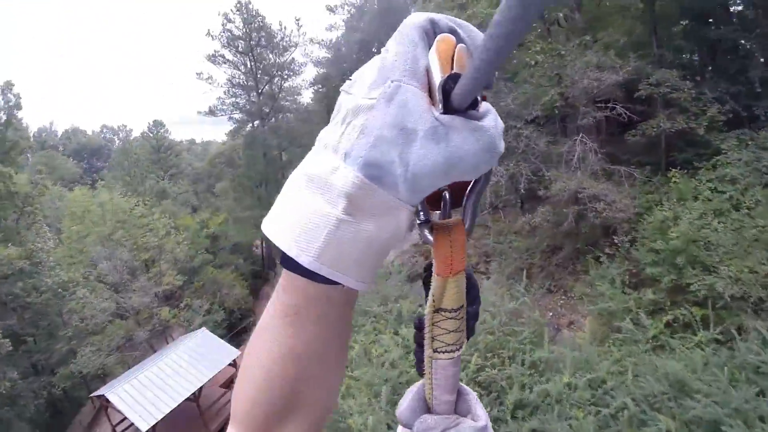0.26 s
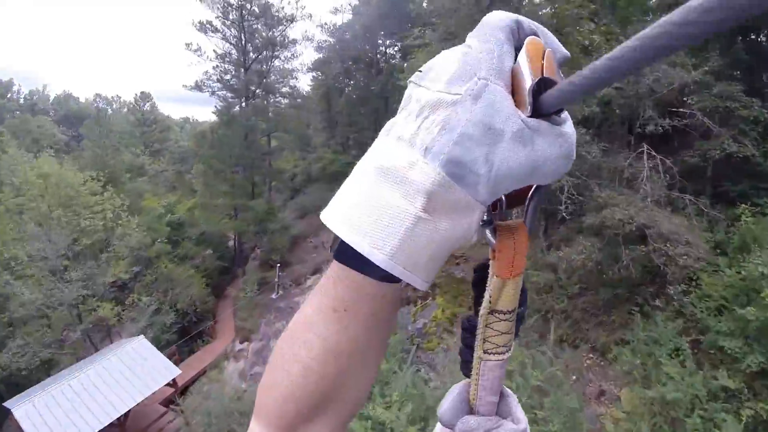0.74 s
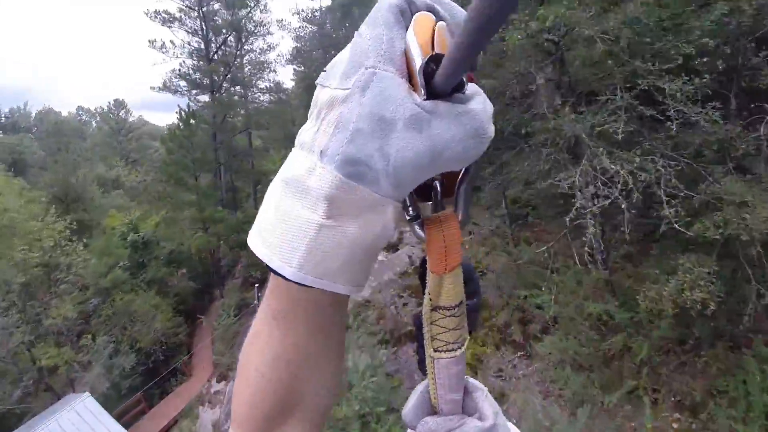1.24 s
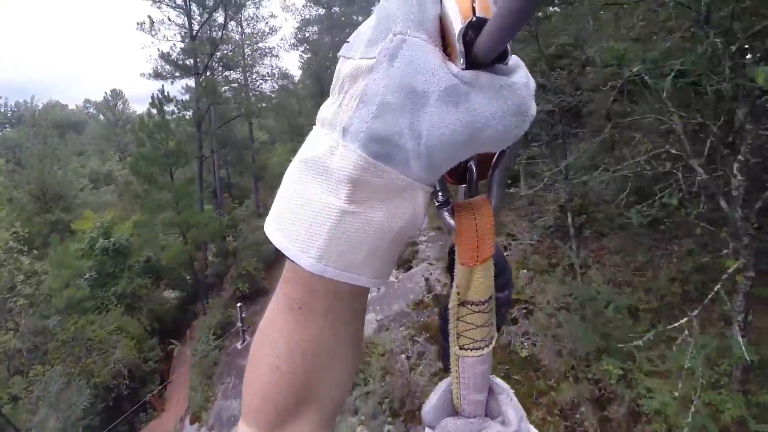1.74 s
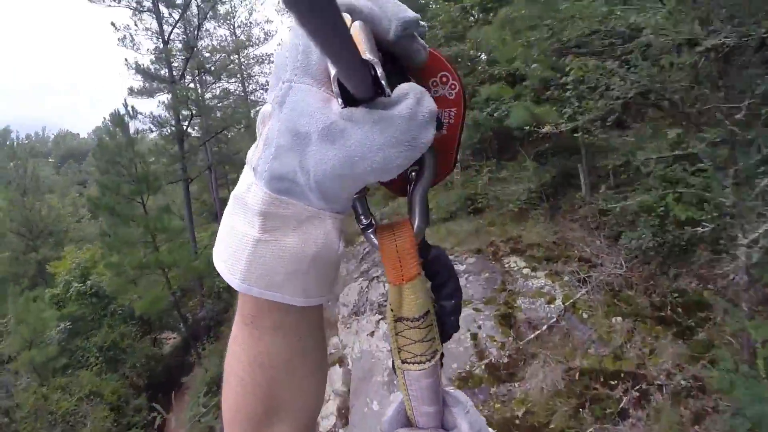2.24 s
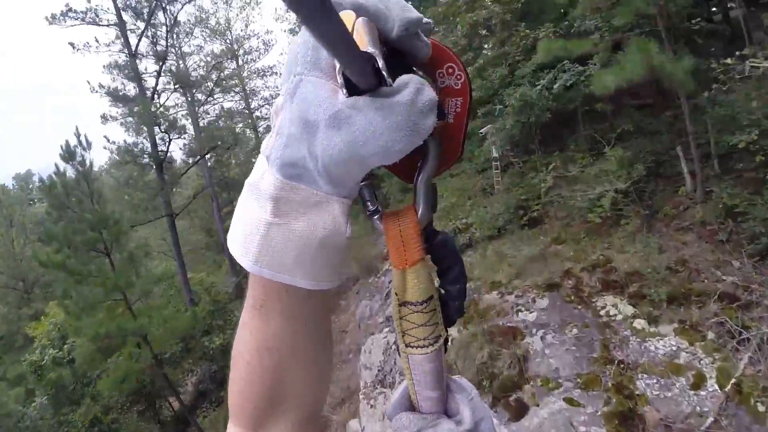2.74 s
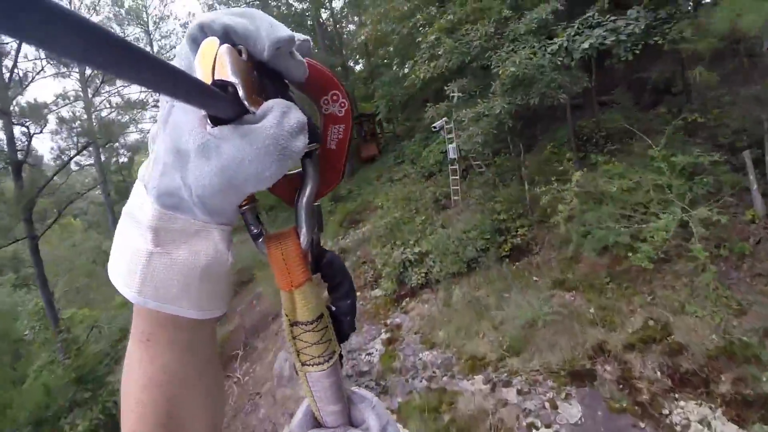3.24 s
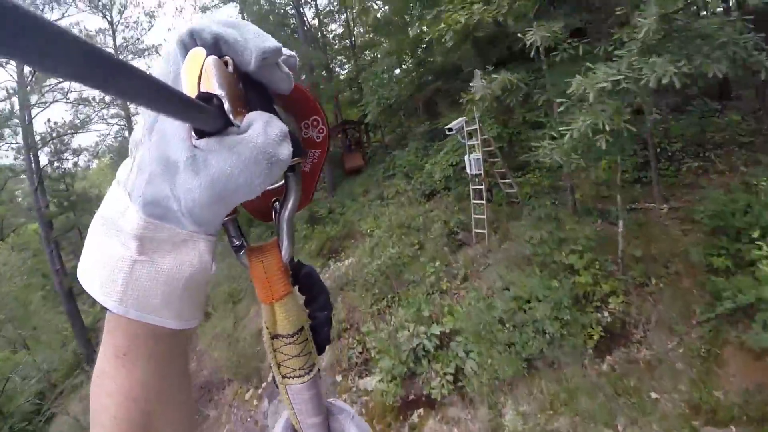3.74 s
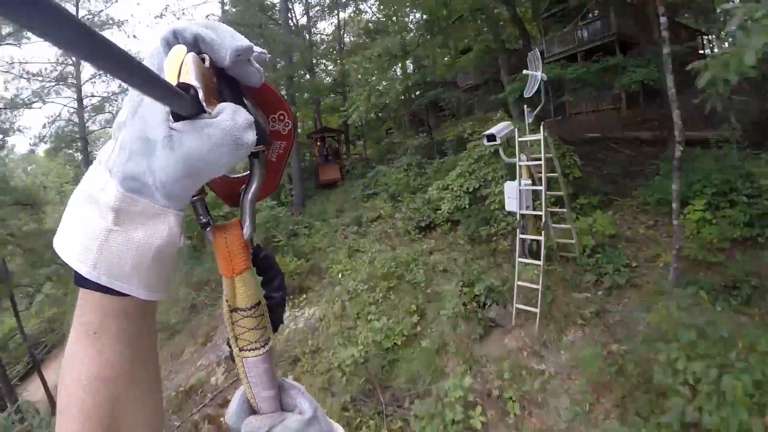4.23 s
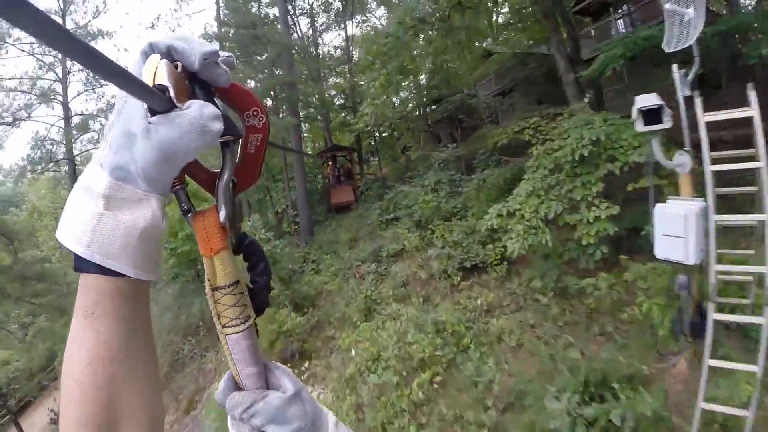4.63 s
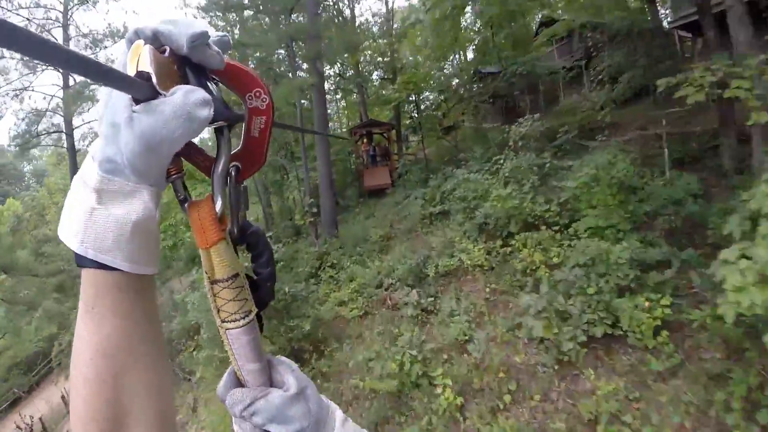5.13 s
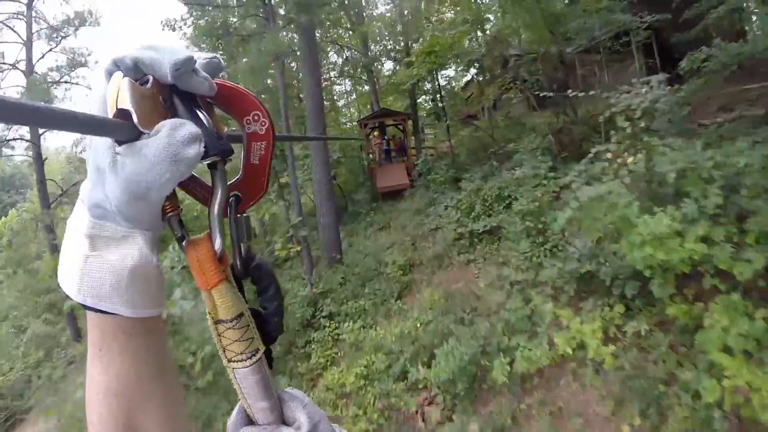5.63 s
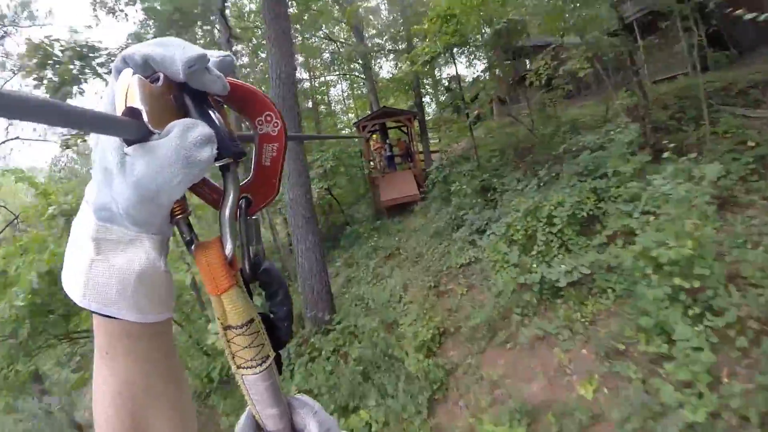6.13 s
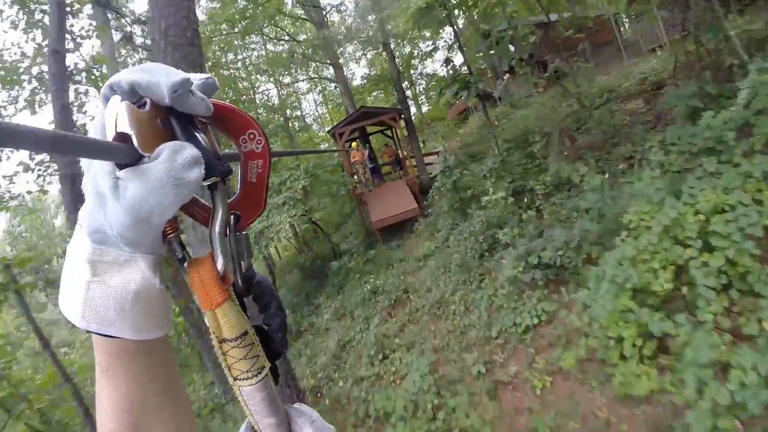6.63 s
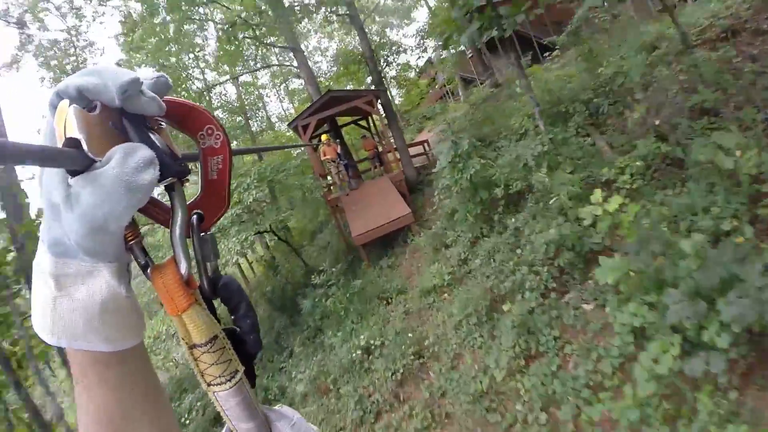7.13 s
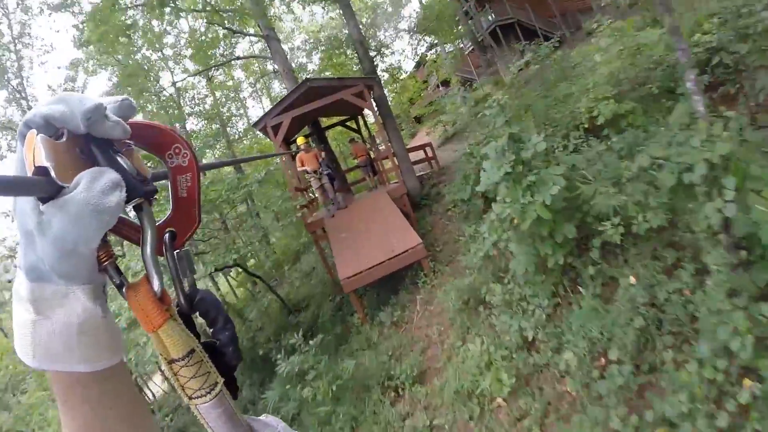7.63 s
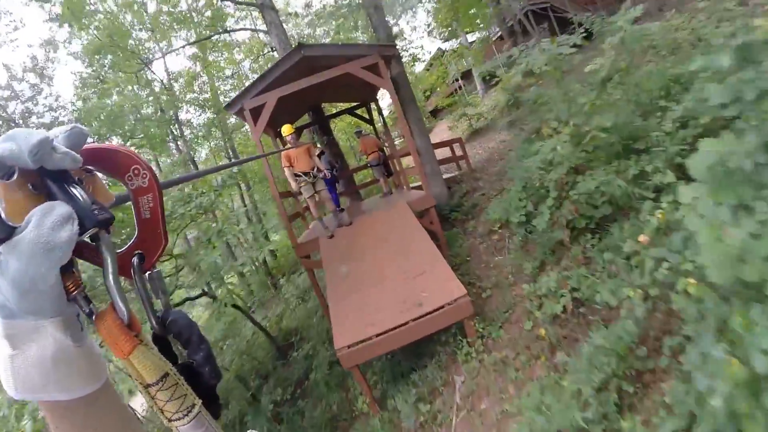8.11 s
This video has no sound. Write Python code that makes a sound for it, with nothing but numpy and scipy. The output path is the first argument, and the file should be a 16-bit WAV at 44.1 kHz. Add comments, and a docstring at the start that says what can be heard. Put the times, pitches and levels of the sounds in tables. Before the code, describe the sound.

Heard at arm's length by the rider, a zipline trolley is already rolling fast on a stranded steel cable. Its bright, grinding whir and buzzing hum climb a little in pitch, hold, then drop steadily as the ride slows. Narrow metallic rings emerge toward the end, while light low wind rumbles on the microphone and fades. Open woods, dry and close.

```python
"""A zipline trolley runs down a stranded steel cable through woods, heard at arm's length from the rider.
Its grind is a pulsing contact force, of noise and brief ticks, that excites the resonances of the metal.
The strands crossed give a harmonic hum whose pitch follows the speed, over a dull noise roar.
The trolley swivels under the rider's hand, which changes its colour; narrow rings emerge as it slows.
Air rumbles lightly on the microphone as resonant noise that grows with speed."""
import sys
import numpy as np
from scipy import signal
from scipy.io import wavfile

SR = 44100
rng = np.random.default_rng(int(sys.argv[2]) if len(sys.argv) > 2 else 0)


def wav_out(sig):
    """Save sig, one row per channel (or a flat mono array), as 16-bit PCM at SR to the path in sys.argv[1]."""
    wavfile.write(sys.argv[1], SR, np.round(np.clip(np.atleast_2d(sig).T, -1, 1) * 32767).astype(np.int16))


N = 369116
CRUISE_HZ = 220  # strands crossed per second at cruising speed


def from_db(db):
    """Logarithmic level: decibels become an amplitude gain."""
    return 10 ** (np.asarray(db) / 20)


def rms_one(x):
    """Power normalisation: the signal is scaled to unit rms."""
    return x / np.sqrt(np.mean(x ** 2) + 1e-20)


def in_time(rows):
    """Linear interpolation: each column of a curve, sample by sample."""
    seconds, *columns = np.transpose(rows)
    time = np.arange(N) / SR
    return [np.interp(time, seconds, column) for column in columns]


def drift(rate_hz):
    """Low-pass filtered randomness: smooth wandering with a spread of about 1."""
    step = 40  # samples between computed points
    r = np.exp(-2 * np.pi * rate_hz * step / SR)
    noise = rng.standard_normal(N // step + 2002)
    slow = signal.lfilter([1], [1, -2 * r, r * r], noise)[2000:]  # the filter has settled by then
    return np.interp(np.arange(N) / step, np.arange(len(slow)), rms_one(slow))


def resonate(x, hz, width_hz):
    """Damped resonance: a two-pole band-pass applied twice, for steep skirts; gain near 1 on top."""
    r = np.exp(-np.pi * width_hz / SR)
    g = (1 - r * r) / 2
    section = [g, 0, -g, 1, -(1 + r * r) * np.cos(2 * np.pi * hz / SR), r * r]
    return signal.sosfilt([section, section], x)


def rush(modes):
    """Resonant filtering of noise: independent noise sounds in each resonance; rms 1 in all."""
    bands = [from_db(db) * resonate(rng.standard_normal(N), hz, width) for hz, width, db in modes]
    return rms_one(sum(bands))


# Heading of the trolley. Each row: time in seconds, swivel (-1 right, 0 straight, 1 left).
HEADING_CURVE = [(0, 0.68), (.25, -0.68), (1.15, -0.85), (1.4, -.3), (1.9, -0.55), (2.15, -.06), (2.9, -.1),
                 (3.15, 0.54), (4.4, 0.73), (4.7, 0.97), (8.37, 0.89)]


def heading():
    """Directional radiation depends on angle: how far the trolley is swung right and left, each 0-1."""
    swivel, = in_time(HEADING_CURVE)
    return np.maximum(-swivel, 0), np.maximum(swivel, 0)


# Air on the microphone and its housing. Each row: centre in Hz, width in Hz, relative level in dB.
WIND_RESONANCES = [(32.2, 32, 2), (84, 79, -5.5), (154.5, 35, -0.5), (238.3, 28, -6.5)]
# Breeze added to the air of the ride. Each row: time in seconds, change of level in dB.
BREEZE_CURVE = [(0, 1), (.9, 2.5), (1.6, -1.5), (3.5, 1.5), (5, 0), (5.8, -4), (6.6, 1), (8.37, 2)]
WIND_DB, WIND_DB_PER_DOUBLING = -38.5, 26.5  # at cruising speed, rise per doubling of speed


def wind(doublings, gust_db=1.0, gust_rate_hz=6):
    """Flow noise: lumpy air on the moving microphone grows with speed and with the breeze."""
    breeze_db, = in_time(BREEZE_CURVE)
    level_db = WIND_DB + WIND_DB_PER_DOUBLING * doublings + breeze_db
    gusts = from_db(gust_db * drift(gust_rate_hz))
    return from_db(level_db) * rms_one(rush(WIND_RESONANCES) * gusts)


# Dull roar of the running cable. Each row: centre in Hz, width in Hz, relative level in dB.
ROAR_RESONANCES = [(360, 660, -5), (656, 245, 1.5), (916, 187, 6)]


def cable_roar(level_db=-47.0, right_db=-4.5, left_db=0.9):
    """Broadband excitation of broad resonances: a dull roar whose level follows the heading."""
    right, left = heading()
    return from_db(level_db + right * right_db + left * left_db) * rush(ROAR_RESONANCES)


# Harmonics of the hum, before the side plates reinforce them. Each row: multiple of the strand rate,
# level in dB at cruising speed and straight heading, change in dB per doubling of speed,
# change in dB when swung right, change in dB when swung left.
HUM_HARMONICS = [(2, -52, -6.5, -12.5, -6), (3, -50.5, 51, -25, 0.5), (4, -44, 12.5, -3.5, 0.5),
                 (5, -42.5, -1, -9, -14.5), (6, -47, 3, -4, 2.5), (7, -42, -3, 6.5, -6), (8, -62, 5, 2, -6)]


def strand_hum(strands, speed, waver_db=1.0, waver_rate_hz=7, fade_db=2.2, fade_rate_hz=0.97,
               slip_rad=0.13, slip_rate_hz=14, plate_hz=1345, plate_half_width_hz=38, plate_boost=1.5):
    """Periodic excitation: harmonics of the strand rate waver, and sing out at the side plates' resonance."""
    right, left = heading()
    doublings = np.log2(speed / CRUISE_HZ)
    hum = np.zeros(N)
    for multiple, db, slope_db, right_db, left_db in HUM_HARMONICS:
        # slipping blurs the upper harmonics most
        phase = 2 * np.pi * strands + slip_rad * drift(slip_rate_hz)
        tone = np.sin(multiple * phase)
        detuning = (multiple * speed - plate_hz) / plate_half_width_hz
        plate_gain = 1 + plate_boost / (1 + detuning ** 2)
        level_db = db + slope_db * doublings + right * right_db + left * left_db
        unsteady = from_db(waver_db * drift(waver_rate_hz) + fade_db * drift(fade_rate_hz))
        hum += from_db(level_db) * plate_gain * rms_one(tone * unsteady)
    return hum


# Narrow rings that emerge as the trolley slows. Each row: centre in Hz, width in Hz, relative level in dB.
SLOW_RING_MODES = [(1752, 95, 8.5), (2020, 70, 0), (2683, 180, 5.5), (2950, 23, -7), (3750, 37, -15),
                   (4866, 210, 3), (5660, 160, -1.5)]


def slow_rings(slowed, level_db=-26):
    """Noise-driven narrow resonances: their power rises in proportion to the loss of speed."""
    return from_db(level_db) * np.sqrt(slowed) * rush(SLOW_RING_MODES)


# Swing of the contact force. Each row: multiple of the strand rate, depth as a share of the mean force.
FORCE_PULSES = [(2 / 3, 0.13), (0.88, 0.15), (2, 0.25), (4.9, 0.069)]


def contact(strands, flutter_db=0.37, flutter_rate_hz=9, grit_db=0.81, grit_rate_hz=250):
    """Amplitude modulation: force under the sheaves pulses with the strands and shakes on uneven wire."""
    pulses = 1 + sum(depth * np.cos(2 * np.pi * multiple * strands) for multiple, depth in FORCE_PULSES)
    unevenness_db = flutter_db * drift(flutter_rate_hz) + grit_db * drift(grit_rate_hz)
    return pulses * from_db(unevenness_db)


def ticks(per_s=230, size=6.6, spread_db=2.5, edge_hz=1300):
    """Impulsive excitation: single wires snap at random, too briefly to stir the low modes much."""
    sizes = size * from_db(spread_db * np.minimum(rng.exponential(1, N), 2))
    happens = rng.random(N) < per_s / SR
    snaps = happens * sizes * rng.choice([-1, 1], N)
    return signal.sosfilt(signal.butter(1, edge_hz, "high", fs=SR, output="sos"), snaps)


# Strength of the grind; only its swing about the mean is used. Each row: time in seconds, level in dB.
GRIND_CURVE = [(0.0, -18.5), (0.11, -20.5), (1.28, -19), (1.54, -17), (2.45, -16.5), (2.87, -17.5),
               (3.12, -16), (3.22, -18), (3.98, -17.5), (4.68, -20), (6.22, -18), (8.37, -21.5)]
# Borders in Hz of the low, middle, high and hiss registers.
REGISTER_BORDERS = [950, 2300, 4300, 7900, 15000]
# The registers, low to hiss. Each row: level in dB at mean strength, cruising speed and straight heading,
# share of the grind's swing, change in dB per doubling of speed, change in dB when swung right,
# change in dB when swung left.
REGISTER_LEVELS = [(-27.5, 0.85, -2.5, 2.5, 0.85), (-21, 1.11, -1, 0.8, 0.5), (-21.5, 1.35, 5.5, 0.8, 0.72),
                   (-33.5, 0.45, 12.5, -3, -8.5)]
# Resonances of trolley and cable, levels relative within a register. Each row: centre in Hz,
# width in Hz, level in dB when swung right, level in dB when straight, level in dB when swung left.
METAL_MODES = [ (1081, 162, -20, -8, -6.5), (1358.6, 80, -5.5, 9, 3), (1436.5, 132, -2.5, 0.5, 6),
               (1702, 91, -4.5, -1.5, 3), (1823, 87, -3, -0.5, 9), (2120, 1420, -17.5, -2, -4),
               (2625, 350, -3.5, 1.5, -9.5), (2825, 243, 0, -2, 2.5), (2930, 102, -6, -4, 2.5),
               (3020, 167, 2.5, 4, -5), (3194, 164, -17, 2, 0.5), (3428, 300, 2, 0, -2.5),
               (3698, 37, 5, 1.5, -3), (3847, 210, 6.5, -8, -9.5), (4090, 270, -5, -4.5, -10.5),
               (4520, 460, 3.5, 2, 0), (4847, 340, -1, 4.5, -1), (5010, 600, -1, 2, -27.5),
               (5440, 510, -3, 2, 2.5), (5990, 220, 3.5, 0, 2), (6450, 610, -7, -2.5, 0.5),
               (6780, 600, -2, -7, 9.5), (7086, 490, -11, -4.5, -3), (7320, 620, -6, -11, -6.5),
               (8100, 290, -1, 13.5, 0.5), (8520, 490, 2.5, 17, 3.5), (9880, 1840, 5.5, 8.5, 1),
               (10970, 2400, -1, -3, -6.5), (13100, 720, -5, 0, -3.5)]


def grind(force, doublings, sway_db=0.31, sway_rate_hz=2):
    """Modal excitation: rolling friction and ticks ring the metal; speed and heading set its colour."""
    right, left = heading()
    strength_db, = in_time(GRIND_CURVE)
    swell_db = strength_db - strength_db.mean()
    # four independent noises share the same ticks
    drives = force * (rng.standard_normal((4, N)) + ticks())
    out = np.zeros(N)
    for low, high, register in zip(REGISTER_BORDERS, REGISTER_BORDERS[1:], REGISTER_LEVELS):
        ringing, power = 0, 0
        for k, (hz, width, right_db, straight_db, left_db) in enumerate(METAL_MODES):
            if low <= hz < high:
                turn_db = right * (right_db - straight_db) + left * (left_db - straight_db)
                gain = from_db(straight_db + turn_db)
                ringing = ringing + gain * resonate(drives[k % len(drives)], hz, width)
                power = power + width * gain ** 2
        # dividing by the expected power leaves the heading's effect on level to the register
        db, share, slope_db, right_db, left_db = register
        level_db = db + share * swell_db + slope_db * doublings + right * right_db + left * left_db
        sway = sway_db * drift(sway_rate_hz)
        out += from_db(level_db + sway) * rms_one(ringing / np.sqrt(power))
    return out


# Antiresonances between the trolley's modes. Each row: centre in Hz, width in Hz,
# depth 0-1 when straight or right, depth 0-1 when left.
ANTIRESONANCES = [(1655, 70, 0, 0.36), (1940, 74, 0, 0.6), (3050, 91, 0.08, 0.8), (3584, 150, 0, 0.6),
                  (4260, 140, 0.7, 0.36), (4990, 83, 0, 0.44), (5880, 140, 0.27, 0.03), (7990, 220, 0.1, 0),
                  (9900, 360, 0, 0.3)]


def hollow(x):
    """Antiresonance: neighbouring modes cancel in narrow bands, to a depth that follows a left swing."""
    _, left = heading()
    for hz, width, straight_depth, left_depth in ANTIRESONANCES:
        band = signal.lfilter(*signal.iirpeak(hz, hz / width, fs=SR), x)
        depth = np.clip(straight_depth + left * (left_depth - straight_depth), 0, 1)
        x = x - depth * band
    return x


# The trolley gathers speed down the sag, then slows on the rise.
# Each row: time in seconds, strands crossed per second before the wobble.
SPEED_CURVE = [(0.0, 195.5), (0.47, 201.8), (0.65, 208.1), (1.37, 215.1), (1.54, 219.6), (1.68, 215.8),
               (2.14, 223.6), (2.49, 219.2), (2.75, 224.7), (3.96, 223.6), (5.48, 215.0), (5.92, 205.6),
               (6.06, 206.8), (7.22, 185.1), (8.21, 159.8), (8.37, 152.8)]


def scene(wobble=0.002972, wobble_rate_hz=5, yield_db=-1.5):
    """Common phase: one count of strands times hum and grind; on slowing, the grind yields to rings."""
    speed, = in_time(SPEED_CURVE)
    doublings = np.log2(speed / CRUISE_HZ)
    strands = np.cumsum(speed * (1 + wobble * drift(wobble_rate_hz))) / SR
    # drop below the top speed so far, as a share of the whole speed range
    slowed = (np.maximum.accumulate(speed) - speed) / np.ptp(speed)

    air = wind(doublings)
    cable = cable_roar() + strand_hum(strands, speed)
    metal = from_db(yield_db * slowed) * grind(contact(strands), doublings)
    trolley = hollow(metal + slow_rings(slowed))
    return (trolley + cable + air)[None]


CUTOFF_HZ = 15100


def record(dry):
    """Band limitation: a steep elliptic low-pass cuts the top."""
    return signal.sosfilt(signal.ellip(12, .1, 90, CUTOFF_HZ, fs=SR, output="sos"), dry)


dry = scene()
out = record(dry)
wav_out(out)
```